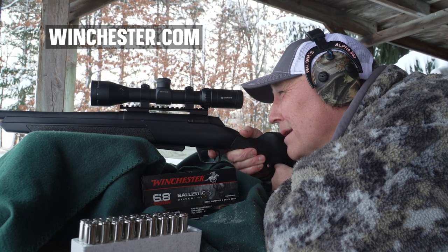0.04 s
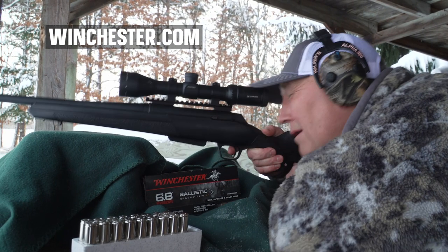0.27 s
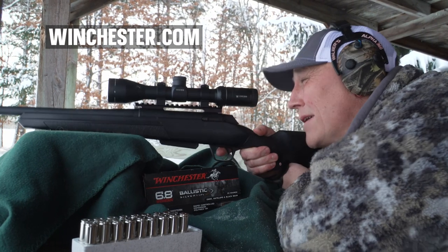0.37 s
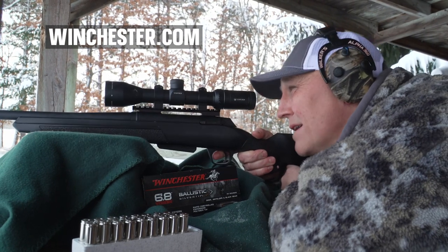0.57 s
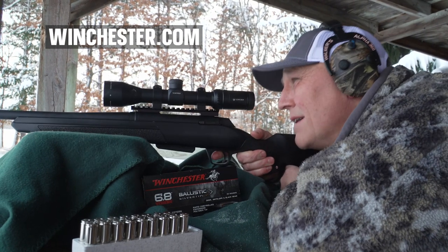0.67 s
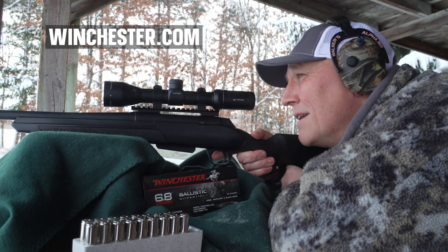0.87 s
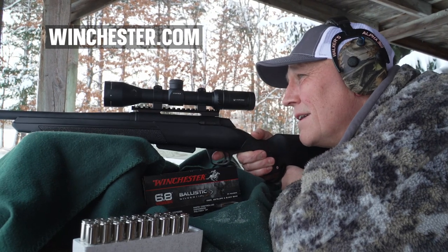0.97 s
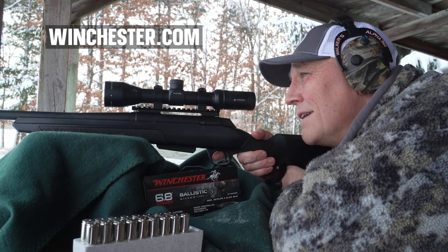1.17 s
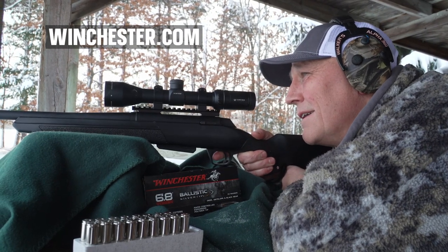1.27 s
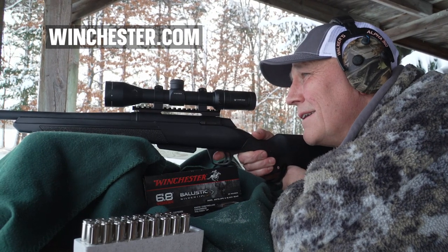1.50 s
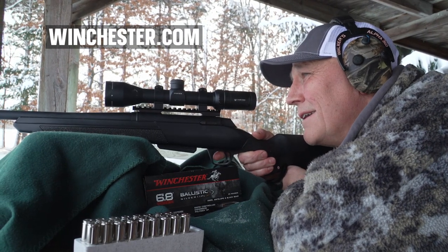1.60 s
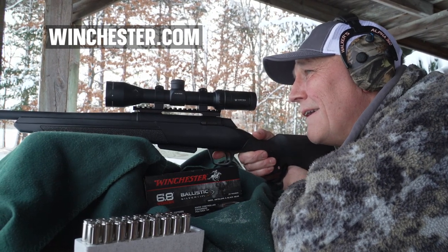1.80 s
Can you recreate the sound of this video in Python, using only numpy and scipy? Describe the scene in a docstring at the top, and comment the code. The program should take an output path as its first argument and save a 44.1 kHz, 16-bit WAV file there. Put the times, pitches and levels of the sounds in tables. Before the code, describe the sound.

A single rifle shot after a brief quiet outdoor hush, blasting close under a wooden shelter and overloading the microphone, then a rough echo from the woods that grows duller and fades.

```python
"""A quiet outdoor hush with a soft low bump and a small tick, then one rifle shot under a bench's wooden roof.
Close by, the action clacks, a noise crack follows, and noise bands and sines make the roof's boom and ring.
The blast overloads the microphone input into square tops and the gain control turns down. From a distance
the woods send back scattered clicks and dull claps, losing treble as the echo rolls away; an uneven low
rumble, made of band noise, and short noise ticks are heard with it."""
import sys
import numpy as np
from scipy import signal
from scipy.fft import rfft, irfft
from scipy.io import wavfile

SR = 44100
rng = np.random.default_rng(int(sys.argv[2]) if len(sys.argv) > 2 else 0)


def log_audio(samples):
    """Write samples as a 16-bit WAV file to the path given in sys.argv[1]."""
    # one column per channel
    frames = np.atleast_2d(samples).T
    # limit to full scale, then quantise
    limited = np.clip(frames, -1, 1)
    pcm = np.round(limited * 32767).astype(np.int16)
    wavfile.write(sys.argv[1], SR, pcm)


N = 81585

# Levels below are source levels, ahead of the microphone's gain control and clipping.
# Noise boom under the roof, band by band: centre_hz, level_db, t60_s, rise_s
ROOF_BOOM = [(82.7, -2, 0.15, 0.011), (168, -9, 0.57, 0.0046), (341.6, -3.5, 0.32, .008),
             (558, 9, 0.19, 0.0043), (1190, 1, 0.17, .003), (2400, 1, 0.17, .002), (4980, -7.5, 0.19, .002),
             (9850, -12, .17, .002)]
# Sustained ring of the roof: pitch_hz, level_db, t60_s
ROOF_RING = [(156.4, -7, .4), (332.4, -8.5, 0.3), (588, -14, 0.16)]
# Body of the echo from the woods: time_s, level_db
WOODS_BODY = [(.37, -29), (.385, -28.5), (.405, -31), (.445, -25.5), (.485, -23), (.51, -27), (.53, -23.5),
              (.58, -26), (.6, -24.5), (0.683, -25), (.71, -26), (.745, -25.5), (0.771, -34), (0.788, -24),
              (0.809, -32), (.88, -29.5), (.96, -32), (1.04, -35.5), (1.11, -41), (1.135, -34.5),
              (1.18, -38), (1.38, -44.5), (1.54, -47), (1.6, -50.5), (1.85, -54)]
# Treble of that echo, compared with the body to set its brightness: time_s, level_db
WOODS_TREBLE = [(.37, -43.5), (.4, -37), (.44, -41.5), (.5, -32.5), (.53, -41), (.58, -43.5), (.62, -40.5),
                (.7, -47.5), (.74, -53.5), (.76, -48.5), (.85, -53), (1.0, -60), (1.1, -66), (1.2, -68),
                (1.4, -80), (1.6, -89), (1.85, -94)]
# Relative spectrum of the echo at the reference treble: freq_hz, density_db (per Hz)
WOODS_TONE = [(71, -32), (120, -17), (184, -37), (271, -0.5), (519, 1), (1040, -6), (1150, -6), (1950, -10),
              (2160, -13), (6330, -30), (15500, -49)]
# How far each frequency follows the treble change: freq_hz, share (ratio)
TREBLE_SHARE = [(150, -.1), (500, 0), (1200, .2), (2200, .5), (6000, 1), (12000, 1.2)]
# Single claps off distant trees and slopes: start_s, level_db (envelope peak before bass cut), pitch_hz
DISTANT_CLAPS = [(0.4016, -10, 430), (0.4148, -15.5, 530), (.4331, -18.5, 410), (0.4866, -11, 497),
                 (0.5063, -13.5, 480), (.539, -17, 390), (0.5897, -11.5, 470), (0.7046, -13.5, 317),
                 (.715, -12.5, 465), (0.7358, -12.5, 400), (0.7483, -20.5, 500), (0.7833, -21.5, 313),
                 (0.8894, -21.5, 494), (0.951, -20, 446), (1.02, -17.5, 495), (1.1289, -27, 467),
                 (1.1376, -21.5, 515), (1.2728, -33, 596), (1.3598, -36.5, 450), (1.375, -31, 540),
                 (1.3969, -33.5, 530), (1.4298, -38, 497), (1.5403, -38.5, 480), (1.6209, -40.5, 516)]
# Low rumble after the shot, rising and falling unevenly: time_s, level_db
RUMBLE_LEVEL = [(0.37, -39), (0.572, -41.5), (0.592, -34), (0.732, -48.5), (0.76, -38), (0.88, -61),
                (0.896, -64), (0.942, -53.5), (1.296, -69.5), (1.314, -60), (1.458, -65), (1.49, -79),
                (1.63, -57), (1.688, -77), (1.8, -60.5), (1.85, -76.5)]
# Small dry ticks, the last very faint: start_s, level_db (raised after the shot), centre_hz
DRY_TICKS = [(0.194, -51, 5000), (.5906, -39, 6000), (.7517, -44, 4000), (1.0444, -62, 10000),
             (1.1134, -59, 4050), (1.122, -47, 4500), (1.1254, -59, 9000), (1.2121, -59, 4000),
             (1.5524, -69, 10000)]
# Relative spectrum of the outdoor air: freq_hz, density_db (per Hz)
AIR_TONE = [(18, -44), (30, -6), (97, -7), (137, 0), (173, -6.5), (230, 1), (307, -8.5), (1330, -13),
            (2020, -19.5), (15500, -38.5)]

# Close: action, muzzle and roof
SHOT_S, LEAD_S = .2441, .0027  # muzzle blast, and how much earlier the action is heard
LEAD_HZ, LEAD_DB, LEAD_T60_S, LEAD_RISE_S = 4500, -40, .02, .0005
CRACK_HZ, CRACK_DB, CRACK_T60_S = 13500, -12.5, .0074
RING_RISE_S = .025
BOOM_END_S, BOOM_END_WIDTH_S = .112, .012  # after the blast: the open sides let the boom die quickly
# Distant: woods
WOODS_IN_S = .09  # the echo builds up before its first row
TREBLE_REF_DB = -18  # treble relative to body at which WOODS_TONE holds
SCATTER_PER_S, SCATTER_DB = 2000, 3.6  # mean click rate, and spread of click levels
SMOOTH_ABOVE_HZ, GROUND_CUT_HZ = 1800, 240  # leaves blur treble into hiss; the ground swallows bass
CLAP_CYCLES, CLAP_CUT_HZ = .7, 210
# Rumble, ticks and air
RUMBLE_HZ, RUMBLE_OCTAVES = 76, .9
TICK_T60_S, TICK_RISE_S, TICK_OCTAVES = .01, .00037, 1.
AIR_DB = -55
BUMP_S, BUMP_HZ, BUMP_DB = .0258, 81, -43.5
# Microphone input
DUCK_DB, DUCK_AT_DB, DUCK_S = 18, -16, .002  # most gain reduction, threshold, smoothing time
CEILING_DB = -10.5
SETTLE_DB, SETTLE_AT_DB, SETTLE_S = -4.5, -24, .014  # lowest limiter gain, threshold, smoothing time
POWER_S, RELEASE_DB_PER_S = .009, 12
MIC_LOW_HZ, EDGE_HZ = 8, 15900


def amp(db):
    """Decibels to amplitude."""
    return 10 ** (np.asarray(db) / 20)


def evened(x):
    """Scale to an RMS of one."""
    return x / np.sqrt(np.mean(x ** 2) + 1e-20)


def read(points, hz):
    """Read a curve along a logarithmic frequency axis."""
    f, value = np.transpose(points)
    return np.interp(np.log(hz + 1), np.log(f + 1), value)


def band(x, hz, octaves):
    """Band-pass around hz."""
    edges = hz * 2 ** (-octaves / 2), min(hz * 2 ** (octaves / 2), SR / 2 - 1000)
    return signal.sosfilt(signal.butter(2, edges, "bandpass", fs=SR, output="sos"), x)


def band_noise(hz, octaves):
    """Band of noise with an RMS of one."""
    return evened(band(rng.standard_normal(N), hz, octaves))


def highpass(x, order, hz):
    """Cut the bass below hz."""
    return signal.sosfilt(signal.butter(order, hz, "highpass", fs=SR, output="sos"), x)


def dying(start, db, t60, rise):
    """Envelope: silence, rise, exponential fall."""
    t = np.maximum(np.arange(N) / SR - start, 0)
    return (1 - np.exp(-t / rise)) ** 2 * amp(db - 60 * t / t60)


def smooth(x, seconds):
    """One-pole smoothing over a time constant."""
    r = np.exp(-1 / (seconds * SR))
    return signal.lfilter([1 - r], [1, -r], x)


def shot():
    """Close: clack of the action and sharp crack as noise bursts, then the roof's noise boom and sine ring."""
    t = np.arange(N) / SR - SHOT_S
    action = band_noise(LEAD_HZ, 1.5) * dying(SHOT_S - LEAD_S, LEAD_DB, LEAD_T60_S, LEAD_RISE_S)
    crack = band_noise(CRACK_HZ, .4) * dying(SHOT_S, CRACK_DB, CRACK_T60_S, rise=.0003)
    ring = sum(np.sin(2 * np.pi * hz * t) * dying(SHOT_S, db, t60, RING_RISE_S)
               for hz, db, t60 in ROOF_RING)
    boom = sum(band_noise(hz, .79) * dying(SHOT_S, db, t60, rise)
               for hz, db, t60, rise in ROOF_BOOM)
    boom_end = (1 - np.tanh((t - BOOM_END_S) / BOOM_END_WIDTH_S)) / 2
    return action + crack + ring + boom * boom_end


def woods():
    """Distant: trunks return scattered clicks, blurred by leaves and duller with time, plus single claps."""
    time_s, level_db = np.transpose(WOODS_BODY)
    click_level = amp(SCATTER_DB * np.minimum(rng.exponential(1, N), 4))
    clicks = click_level * (rng.random(N) < SCATTER_PER_S / SR)
    signed_clicks = evened(clicks * rng.choice([-1., 1.], N))
    drive = np.array([signed_clicks, rng.standard_normal(N)])
    hz, frame_s, (grains, hiss) = signal.stft(drive, SR, nperseg=512, noverlap=384)

    # blend clicks into hiss towards the treble, keeping the power
    hiss_share = (.15 + .85 / (1 + (SMOOTH_ABOVE_HZ / (hz + 1)) ** 2))[:, None]
    blend = np.sqrt(1 - hiss_share) * grains + np.sqrt(hiss_share) * hiss

    treble_db = np.interp(frame_s, *np.transpose(WOODS_TREBLE))
    body_db = np.interp(frame_s, time_s, level_db)
    treble_change_db = treble_db - body_db - TREBLE_REF_DB
    tone_db = read(WOODS_TONE, hz)[:, None] + read(TREBLE_SHARE, hz)[:, None] * treble_change_db
    tone = amp(tone_db)
    body = (hz > 250) & (hz < 1000)
    tone /= np.sqrt((tone[body] ** 2).sum(0) / len(hz))  # even the body before its level is applied
    roll = signal.istft(blend * tone, SR, nperseg=512, noverlap=384)[1][:N]

    t = np.arange(N) / SR
    fade_in = np.clip((t - time_s[0]) / WOODS_IN_S + 1, 0, 1)
    echo = fade_in * amp(np.interp(t, time_s, level_db)) * roll
    claps = sum(amp(db) * clap(at, pitch_hz, CLAP_CYCLES) for at, db, pitch_hz in DISTANT_CLAPS)
    return highpass(echo, order=3, hz=GROUND_CUT_HZ) + highpass(claps, order=2, hz=CLAP_CUT_HZ)


def clap(at, hz, cycles):
    """A dull pulse that starts suddenly and rings out in a few cycles."""
    u = np.maximum(np.arange(N) / SR - at, 0) * hz
    return -np.sin(2 * np.pi * u) * u / cycles * np.exp(1 - u / cycles)


def rumble():
    """Low rumble after the shot: a noise band following an uneven level curve."""
    time_s, level_db = np.transpose(RUMBLE_LEVEL)
    t = np.arange(N) / SR
    level = amp(np.interp(t, time_s, level_db))
    return band_noise(RUMBLE_HZ, RUMBLE_OCTAVES) * level * (t > SHOT_S)


def ticks():
    """Short bright noise clicks, raised after the shot to offset the turned-down gain."""
    hiss = rng.standard_normal(N)
    out = np.zeros(N)
    for start_s, level_db, centre_hz in DRY_TICKS:
        raised_db = level_db + DUCK_DB * (start_s > SHOT_S)
        envelope = dying(start_s, raised_db, TICK_T60_S, TICK_RISE_S)
        out += evened(band(hiss, centre_hz, TICK_OCTAVES)) * envelope
    return out


def air():
    """Background: shaped noise makes the outdoor hush, a bell-windowed sine one soft low bump."""
    spectrum = rfft(rng.standard_normal(N)) * amp(read(AIR_TONE, np.fft.rfftfreq(N, 1 / SR)))
    hush = evened(irfft(spectrum, N))
    return amp(AIR_DB) * hush - amp(BUMP_DB) * wavelet(BUMP_S, BUMP_HZ, cycles=1.2)


def wavelet(at, hz, cycles):
    """A few cycles under a bell-shaped window."""
    u = (np.arange(N) / SR - at) * hz
    return -np.sin(2 * np.pi * u) * np.exp(-(2 * u / cycles) ** 2)


def scene():
    """Shot, echo and rumble, lifted to drive the input into overload, with the ticks and air."""
    lifted = shot() + woods() + rumble()
    return (amp(DUCK_DB) * lifted + ticks() + air())[None]


def record(dry):
    """Gain control drops at the blast and stays down; the input clips; a slower limiter settles; band limit."""
    # a running maximum keeps the gain down
    loud_db = np.maximum.accumulate(20 * np.log10(abs(dry[0]) + 1e-9))
    duck_db = smooth(np.clip(loud_db - DUCK_AT_DB, 0, DUCK_DB), DUCK_S)
    x = dry[0] / amp(duck_db)
    x = np.clip(x, -amp(CEILING_DB), amp(CEILING_DB))

    # the limiter follows peaks of power that fall back at a steady rate
    fall_db = np.arange(N) * RELEASE_DB_PER_S / SR
    power_db = 10 * np.log10(smooth(x ** 2, POWER_S) + 1e-12)
    held_db = np.maximum.accumulate(power_db + fall_db) - fall_db
    over_db = held_db - SETTLE_AT_DB
    x = x * amp(smooth(np.clip(-over_db, SETTLE_DB, 0), SETTLE_S))

    x = signal.lfilter(*signal.butter(1, MIC_LOW_HZ, "highpass", fs=SR), x)
    treble_limit = signal.firwin(255, EDGE_HZ, window=("kaiser", 9), fs=SR)
    return signal.oaconvolve(x, treble_limit, "same")[None]


dry = scene()
out = record(dry)
log_audio(out)
```